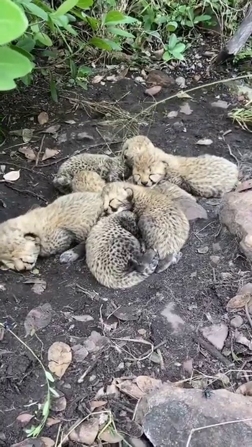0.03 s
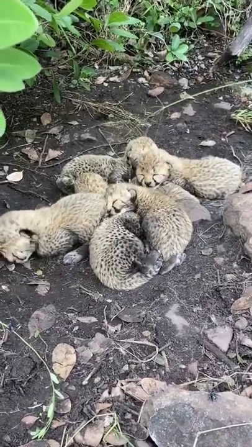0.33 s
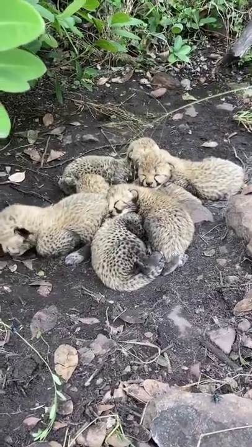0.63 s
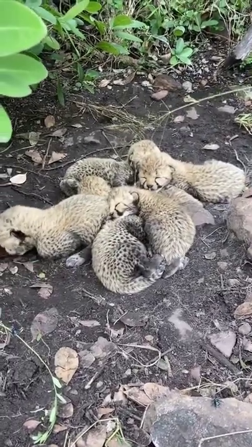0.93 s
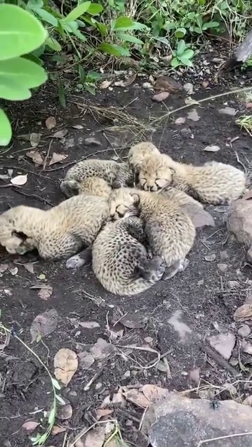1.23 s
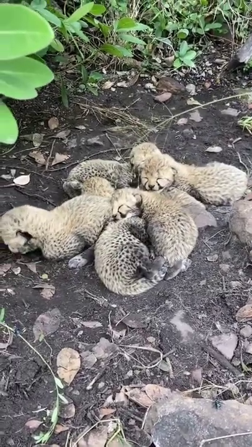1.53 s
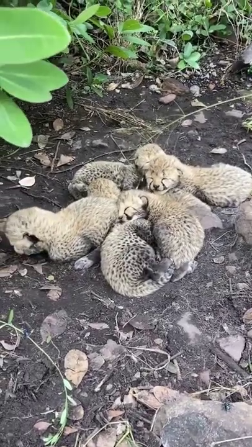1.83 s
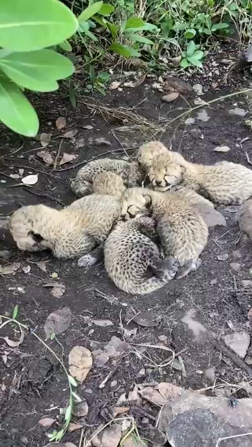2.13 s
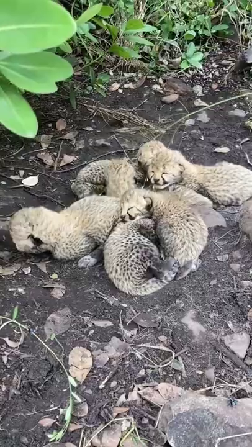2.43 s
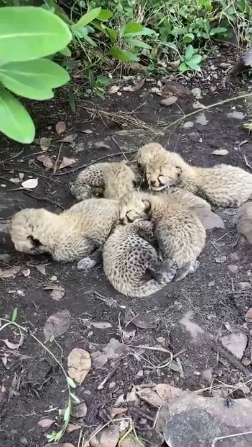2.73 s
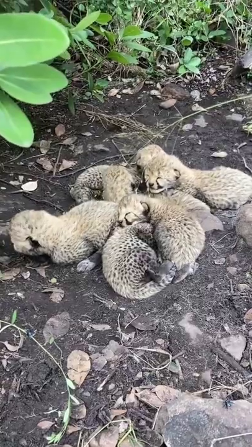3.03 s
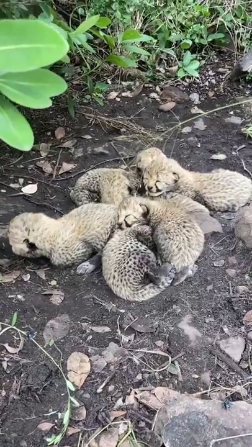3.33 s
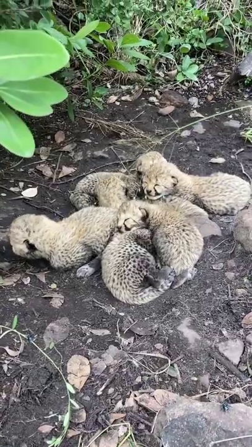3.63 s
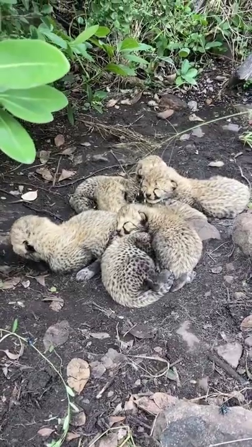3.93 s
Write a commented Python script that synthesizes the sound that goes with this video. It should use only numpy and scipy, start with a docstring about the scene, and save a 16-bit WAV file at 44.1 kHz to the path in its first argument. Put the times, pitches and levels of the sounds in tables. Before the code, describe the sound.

Birdsong among trees, with sharp chips, high whistles and ticks quickening into a trill.

```python
"""Birds in a wood, all out of sight, over a quiet hush and the slow rumble of a hand-held microphone.
From the start, high whistles and a far dove's coos come and go, and one bird sweeps thin ticks upward.
About a second in, another on the left gives a down-slur and a run of sharp arched chips.
The ticks speed into a trill, and near the end a third bird adds two lower slurred chirps.
Each voice is an unsteady gliding tone, some with several partials, and the trees scatter every call."""
import sys
import numpy as np
from scipy import signal
from scipy.fft import rfft, irfft
from scipy.io import wavfile
from scipy.ndimage import uniform_filter1d

SR = 44100
rng = np.random.default_rng(int(sys.argv[2]) if len(sys.argv) > 2 else 0)


def int16_out(signal):
    """Quantize to a 16-bit WAV file."""
    q = np.round(np.clip(np.atleast_2d(signal).T, -1, 1) * 32767)
    wavfile.write(sys.argv[1], SR, q.astype(np.int16))


N = 176400
WOOD_T60_S = 0.99
WAVER, RASPY_WAVER = .004, .045  # pitch wobble of a clean and a raspy voice, as shares of the pitch


def undb(db):
    """Decibels to gain."""
    return 10 ** (np.asarray(db) / 20)


def unit(x):
    """Scale to rms 1."""
    return x / np.sqrt(np.mean(x ** 2))


def pan(db):
    """Left and right gains, the left louder by db."""
    gains = undb(np.array([[db], [-db]]) / 2)
    return gains / np.sqrt(np.mean(gains ** 2))


def walk(rate, size):
    """A smooth random drift that turns rate times a second, with a spread near 1."""
    hold = max(int(SR / rate), 1)
    steps = np.repeat(rng.standard_normal(size // hold + 1), hold)
    return 1.674 * uniform_filter1d(steps, hold)[:size]


def add(track, start, sound):
    """Lay a sound into a track at start seconds."""
    i = int(start * SR)
    a, b = max(i, 0), min(i + sound.shape[-1], N)
    if b > a:
        track[..., a:b] += sound[..., a - i:b - i]


def contour(rows):
    """Smooth pitch and gain through points of seconds, Hz and dB, with 3 ms soft ends."""
    times, hz, db = np.array(rows, float).T
    t = np.arange(times[0], max(times[-1], times[0] + .005), 1 / SR)
    edge = np.sin(np.pi / 2 * np.clip(np.minimum(t - t[0], t[-1] - t) / .003, 0, 1)) ** 2
    pitch = uniform_filter1d(np.interp(t, times, hz), size=200, mode="nearest")
    return pitch, edge * undb(np.interp(t, times, db))


def syrinx(hz, gain, partials=((1, 0),), flutter=.13, rate=400, waver=WAVER):
    """A bird's voice: the pitch wavers, the level flutters, and the weaker a partial, the raspier it is."""
    size = len(hz)
    phase = 2 * np.pi * np.cumsum(hz * (1 + waver * walk(rate, size))) / SR
    tone = sum(undb(db) * np.sin(round(k) * phase + .03 * db * walk(900, size)) for k, db in partials)
    return np.sqrt(2) * gain * (1 + flutter * walk(rate, size)) * tone


def notes(table, shape, partials=lambda progress: ((1, 0),), waver=lambda progress: WAVER):
    """Notes of one shape, each with its own length, pitch, level and side."""
    out = np.zeros((2, N))
    for start, length, top_hz, db, pan_db in table:
        hz, gain = contour(np.array(shape) * [length, top_hz, 1])
        progress = np.linspace(0, 1, len(hz))
        note = syrinx(hz, gain, partials(progress), waver=waver(progress))
        add(out, start, pan(pan_db) * undb(db) * note)
    return out


def glides(table, edge_db, **voice):
    """Pure gliding tones, loudest in the middle."""
    out = np.zeros((2, N))
    for start, length, first, middle, last, db, pan_db in table:
        hz, gain = contour([(0, first, edge_db), (length / 2, middle, 0), (length, last, edge_db)])
        tone = syrinx(hz, gain * signal.windows.tukey(len(hz), .3), **voice)
        add(out, start, pan(pan_db) * undb(db) * tone)
    return out


def wood(x, t60=WOOD_T60_S):
    """Scatter from nearby ground and leaves, then a long tail from the trunks."""
    t = np.arange(2 * SR) / SR
    tail = undb(-60 * t / t60) * (1 - np.exp(-t / .0077))
    scatter = np.exp(-t / .023) * (1 - np.exp(-t / .0083))
    far, near = (unit(fade * rng.standard_normal((2, len(t)))) / np.sqrt(len(t))
                 for fade in (tail, scatter))
    return signal.fftconvolve(x[None], far + undb(1) * near, axes=1)[:, :N]


def heard(direct, echo_db, t60=WOOD_T60_S):
    """A call at the microphone: direct sound and its echo, which leans a little to the same side."""
    lean = np.std(direct, axis=1, keepdims=True) ** .5
    return direct + undb(echo_db) * unit(lean) * wood(direct.mean(0), t60)


def hush():
    """Distant air and foliage all round the microphone, gently swelling."""
    # Each row: frequency in Hz, relative noise density in dB.
    spectrum = [(30, 6.5), (60, 0.5), (110, -4.5), (260, -11.5), (450, 0.5), (640, -12), (1100, -11.5),
                (1900, -19.5), (2700, -23), (3900, -21.5), (5500, -23), (8500, -31), (10200, -36.5),
                (15000, -40)]
    hz, db = np.array(spectrum).T
    freqs = np.maximum(np.arange(N // 2 + 1) * SR / N, 1)
    gain = undb(np.interp(np.log(freqs), np.log(hz), db))
    alike = .29 + .5 * np.exp(-(freqs / 180) ** 2)  # left and right are most alike in the bass
    mid, side = (irfft(rfft(rng.standard_normal(N)) * gain * np.sqrt(1 + sign * alike), N)
                 for sign in (1, -1))
    level_db = -59 + .67 * walk(5.66, N)
    return unit(np.array([mid + side, mid - side])) * pan(-2) * undb(level_db)


def rumble():
    """Very slow pressure swings at the hand-held microphone, throbbing a few times a second."""
    band = signal.butter(3, (5.36, 11.93), "bandpass", fs=SR, output="sos")
    throb_hz = 4.9 * (1 + .097 * walk(2.192, N))
    throb = 1 + .5 * np.sin(2 * np.pi * np.cumsum(throb_hz) / SR)
    swings = signal.sosfilt(band, rng.standard_normal(2 * N))[N:]
    return unit(throb * swings) * undb(-32.5) * pan(-4.5)


def far_birds():
    """Faint calls from deep in the wood that reach the microphone only as echo."""
    # Each row: start and length in seconds, first, middle and last pitch in Hz, level in dB.
    calls = [(-.04, 0.1, 5840, 4200, 3380, -62.5), (0.267, 0.14, 4869, 4650, 4700, -80.5),
             (1.587, 0.028, 2440, 2337, 2270, -71), (3.144, 0.014, 2770, 2470, 2430, -57),
             (2.201, 0.216, 400.3, 457.6, 500, -58), (2.598, 0.61, 420, 382, 348, -73)]
    voices = glides([(*row, 0) for row in calls], edge_db=-8, flutter=.41, rate=146.6)
    return wood(voices.mean(0), t60=.82)


def dove():
    """A far dove, mostly to the right, its low coos hanging among the trunks."""
    # Each row: start and length in seconds, first, middle and last pitch in Hz, level and pan in dB.
    coos = [(.06, 0.066, 352, 433, 553, -65, -5), (.795, .05, 335, 392, 445, -56, 6),
            (.85, 0.19, 485, 468, 430, -59.5, 4), (1.16, 0.166, 478, 524, 544, -54.5, -10),
            (1.36, 0.08, 525, 537, 548, -54.5, -4), (1.77, 0.18, 490, 480, 468, -55.5, 2),
            (1.89, .14, 490, 455, 415, -56, -7), (2.48, 0.11, 440, 428, 420, -54, -9),
            (3.58, .14, 430, 440, 450, -55.5, -6)]
    left, right = glides(coos, edge_db=-1, flutter=.3, rate=45.5, waver=.02)
    late_left = np.roll(left, int(.0007 * SR))
    return heard(np.array([late_left, right]), echo_db=-3, t60=3)


def whistling_birds():
    """Thin high whistles from either side, as much echo as direct sound."""
    # Each row: start and length in seconds, first, middle and last pitch in Hz, level and pan in dB.
    whistles = [(-.05, 0.073, 7715, 7700, 7450, -55.5, -4.5), (.55, 0.17, 9180, 8270, 7600, -67, 9),
                (.7, 0.29, 7650, 7190, 7210, -68.5, 8.5), (1.385, 0.1297, 6900, 7340, 7800, -57, -18.5),
                (2.63, 0.12, 7290, 7300, 7170, -61, -11), (2.69, 0.084, 7310, 7640, 7730, -57.5, -11),
                (2.965, .085, 7017, 7420, 7484, -56.5, -7)]
    return heard(glides(whistles, edge_db=-8, flutter=.37, rate=130), echo_db=0, t60=.64)


def small_birds():
    """Rising peeps well to the right, and later rough little twits well to the left."""
    # Each row: start and length in seconds, top pitch in Hz, level in dB.
    peeps = [(0.682, 0.046, 4260, -64), (0.789, 0.033, 4200, -56.5), (2.209, 0.047, 4010, -67)]
    twits = [(3.486, 0.031, 3580, -50), (3.598, 0.018, 4660, -60.5), (3.872, 0.023, 3950, -47.5)]
    # The course of one note. Each row: share of its length, pitch ratio, level in dB.
    peep_shape = [(0, .78, -6), (0.5, 0.88, -3), (1, 1, -1)]
    twit_shape = [(0, 0.8, -12), (.25, 1, -7), (.5, .7, 0), (1, 0.6, -1)]
    pan_db = 15
    peeping = notes([(*row, -pan_db) for row in peeps], peep_shape)
    twitting = notes([(*row, pan_db) for row in twits], twit_shape, waver=lambda progress: RASPY_WAVER)
    return heard(peeping + twitting, echo_db=0)


def trilling_bird():
    """Straight ahead, uneven upswept ticks quicken into a trill that carries more echo."""
    # The ticks before the trill. Each entry: time in seconds.
    lead_in = [0.364, .498, 0.632, 0.754, 0.878, 0.994, 1.114, 1.228, 1.338, 1.454, 1.567, 1.68, 1.789,
               1.897, 2.006, 2.116, 2.226, 2.331, 2.434, 2.537, 2.64, 2.708]
    # One tick. Each row: seconds from its middle, pitch in Hz, level in dB.
    tick_shape = [(-.018, 3310, -17), (-.009, 3997, -7.5), (0, 5420, -7.5), (.008, 7430, -4.5),
                  (0.013, 8700, -14.5), (.017, 9670, -15)]
    # The song sinks as it goes. Each row: time in seconds, low and top pitch in Hz, level and echo in dB.
    song_range = [(.37, 7300, 9200, -62, -7), (.65, 7450, 9500, -56.5, -1), (1.2, 6070, 9600, -52, -6.5),
                  (1.85, 3860, 9500, -53.5, -3.5), (2.5, 3850, 8800, -59.5, 3), (2.8, 3390, 7056, -57, 6.5),
                  (3.7, 3400, 6510, -55.5, 2.5), (3.85, 2930, 5090, -59.5, -6.5)]
    range_times, *range_columns = np.array(song_range).T
    trill = np.arange(2.764, 3.88, .0604)  # seconds
    times = [*lead_in, *trill]
    direct, to_trees = np.zeros(N), np.zeros(N)
    for time, (louder, longer) in zip(times, rng.standard_normal((len(times), 2))):
        sweep = np.array(tick_shape) * [1 + .04 * longer, 1, 1]
        hz, gain = contour(sweep)
        low, top, db, echo_db = (np.interp(time, range_times, column) for column in range_columns)
        outside_hz = np.maximum(np.maximum(low - hz, hz - top), 0)
        fade = np.exp(-outside_hz / 800)
        hooked_hz = top - np.abs(top - hz)  # the sweep turns back down at the top
        tick = syrinx(hooked_hz, gain * undb(db) * fade, flutter=.33)
        start = time + sweep[0, 0]
        add(direct, start, tick * undb(.8 * louder))
        add(to_trees, start, tick * undb(echo_db))
    return direct + wood(to_trees)


def chipping_bird():
    """On the left, a two-voiced down-slur, a flat chip, then four arched chips."""
    # The two opening notes. Each row: time in seconds, fundamental in Hz, level in dB.
    slur = [(.874, 3920, -48), (.886, 4360, -51), (0.895, 4670, -38.5), (0.907, 4240, -38.5),
            (0.916, 3610, -34.5), (.924, 2945, -46.5), (.932, 1740, -56)]
    flat_chip = [(1.084, 927, -55), (1.093, 1014, -41), (1.101, 1009, -41.5), (1.112, 983, -38),
                 (1.125, 985, -40), (1.138, 766, -45.5)]
    # Each row: start and length in seconds, top fundamental in Hz, level in dB, roundness from 0 to 1.
    chips = [(1.198, 0.05, 1962, -39, 0.01), (1.305, 0.049, 1906, -38.5, 0.38),
             (1.42, .055, 1885, -38.5, 0.71), (1.549, 0.056, 1985, -38, .1)]
    # The arch of a chip. Each row: share of its length, pitch ratio, level in dB.
    chip_shape = [(0, .8, -22), (.16, .95, -8), (.33, 1, -5), (.6, .94, 0), (.8, .865, -2), (1, .785, -12)]
    # Each row: multiple of the fundamental, level in dB.
    flat_partials = [(3, -34), (4, -5.5), (5, -2), (7, -29.5), (9, -35)]
    chip_partials = [(2, -12.5), (3, -0.5), (4, -19), (5, -36), (6, -39.5)]
    out, pan_db = np.zeros((2, N)), 8.5
    share, ratio, shape_db = np.array(chip_shape).T
    depth = 1 - ratio.min()
    for start, length, top_hz, db, roundness in chips:
        arch = 1 - depth * ((1 - ratio) / depth) ** (1 + roundness)
        shape = np.c_[share, arch, shape_db]
        out += notes([(start, length, top_hz, db, pan_db)], shape, lambda progress: chip_partials)
    hz, gain = contour(slur)
    lower_voice = syrinx(hz, gain)
    upper_voice = syrinx(hz * 1.11, gain * undb(-11))  # the second side of the syrinx
    add(out, slur[0][0], pan(pan_db) * (lower_voice + upper_voice))
    add(out, flat_chip[0][0], pan(pan_db) * syrinx(*contour(flat_chip), flat_partials))
    return heard(out, echo_db=-7.5)


def chirping_bird():
    """On the left, two chirps that rise as a raspy chord and settle into a clean falling whistle."""
    # Each row: start and length in seconds, top fundamental in Hz, level and pan in dB.
    chirps = [(3.267, .114, 808.3, -33, 8.5), (3.703, 0.112, 803, -32.5, 8.5)]
    # The course of a chirp. Each row: share of its length, pitch ratio, level in dB.
    chirp_shape = [(0, .66, -26), (.15, .75, -19), (.26, .89, -13), (.35, 1.01, -6), (.52, .99, 0),
                   (.75, .945, -1.5), (.88, .915, -11), (1, .83, -17)]
    # Each row: multiple of the fundamental, level in dB at the start and once settled.
    chord = [(3, -7, 0), (4, 0, -20), (6, -6, -34)]
    thinning = lambda progress: [(k, np.interp(progress, (.25, .44), levels)) for k, *levels in chord]
    clearing = lambda progress: np.interp(progress, (.24, .34), (RASPY_WAVER, WAVER))
    return heard(notes(chirps, chirp_shape, partials=thinning, waver=clearing), echo_db=-6.5)


def scene():
    """Three main singers and the fainter birds around them, over the hush and the rumble."""
    singers = chipping_bird() + chirping_bird() + trilling_bird()
    fainter_birds = small_birds() + whistling_birds() + far_birds() + dove()
    return singers + fainter_birds + hush() + rumble()


def record(dry):
    """The recorder cuts the top steeply above 15450 Hz."""
    return signal.sosfilt(signal.ellip(8, .2, 70, 15450, fs=SR, output="sos"), dry)


dry = scene()
out = record(dry)
int16_out(out)
```